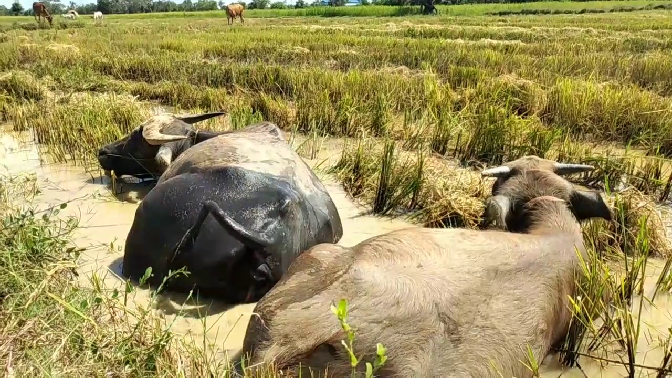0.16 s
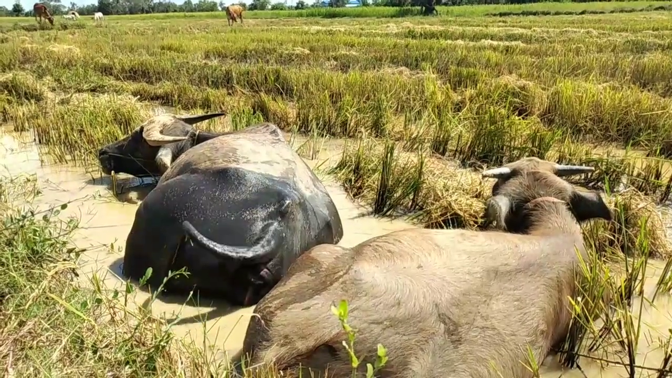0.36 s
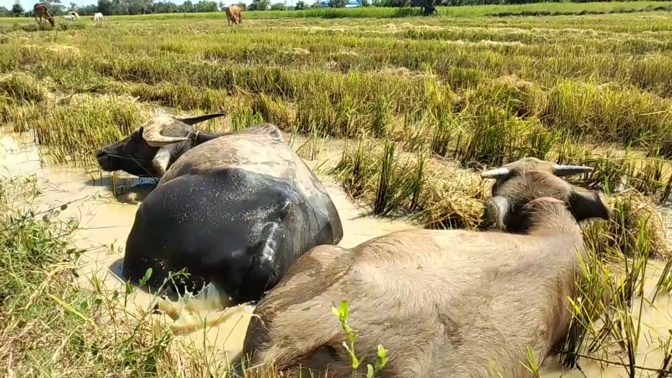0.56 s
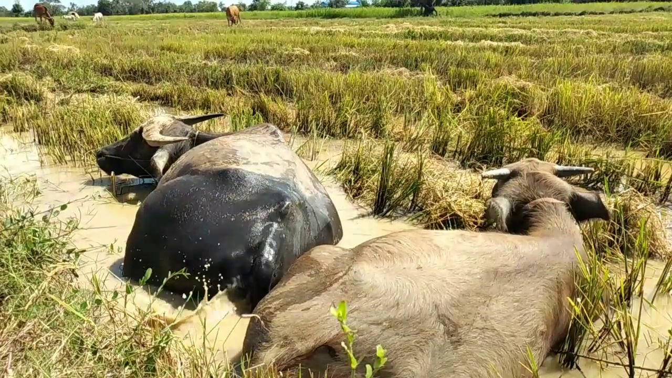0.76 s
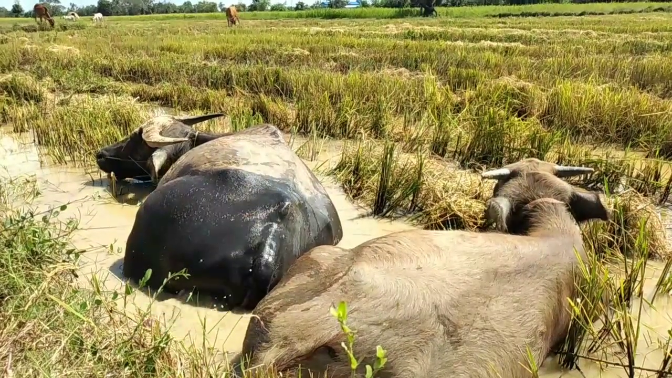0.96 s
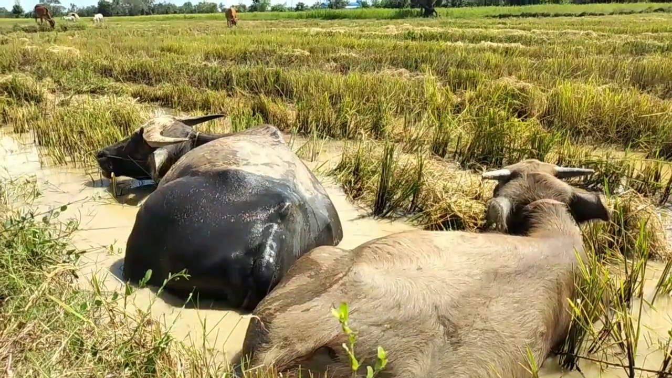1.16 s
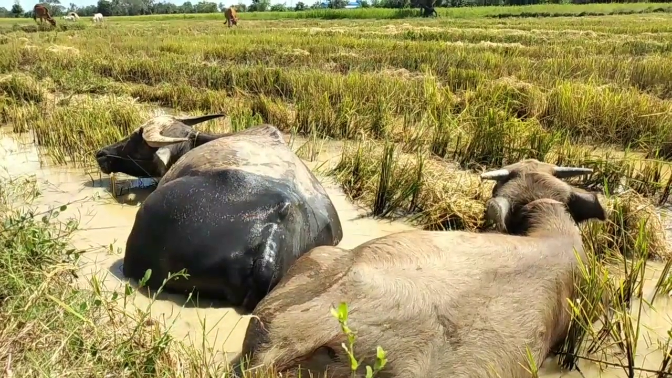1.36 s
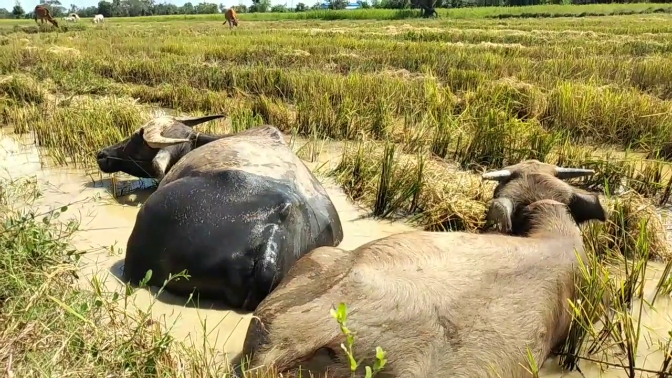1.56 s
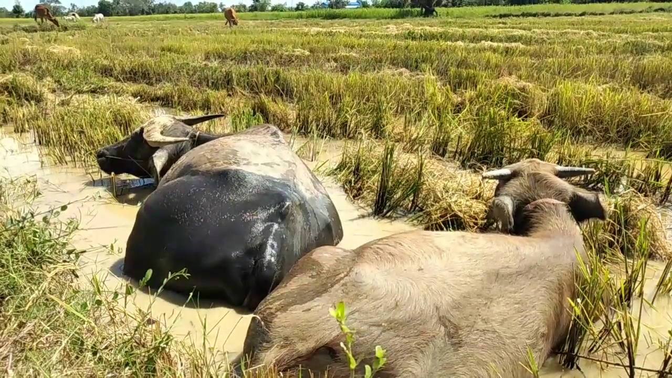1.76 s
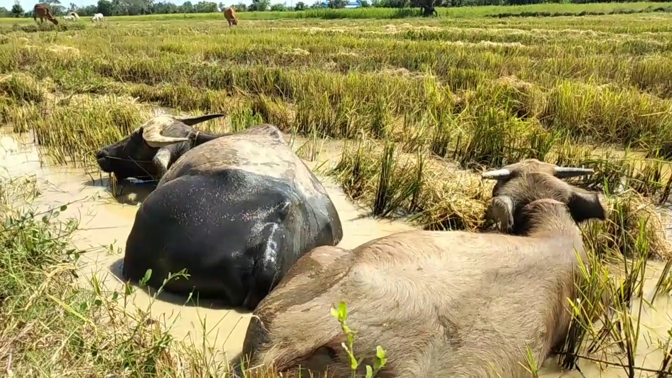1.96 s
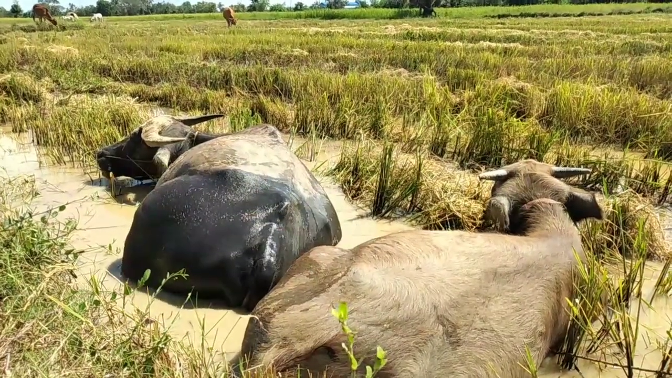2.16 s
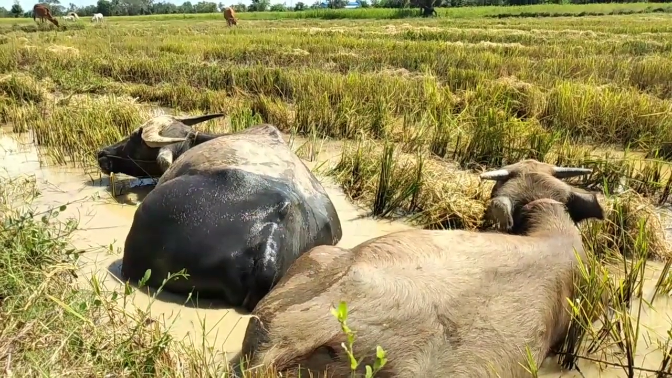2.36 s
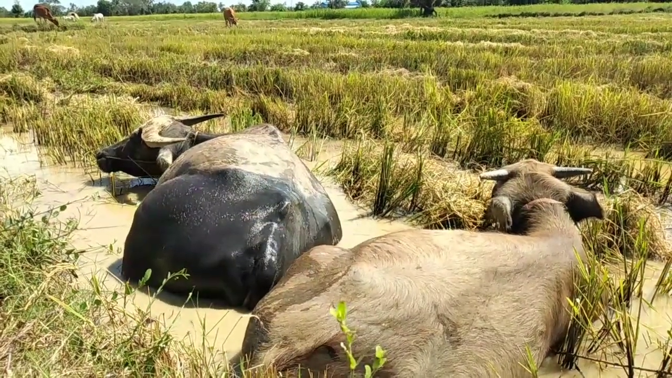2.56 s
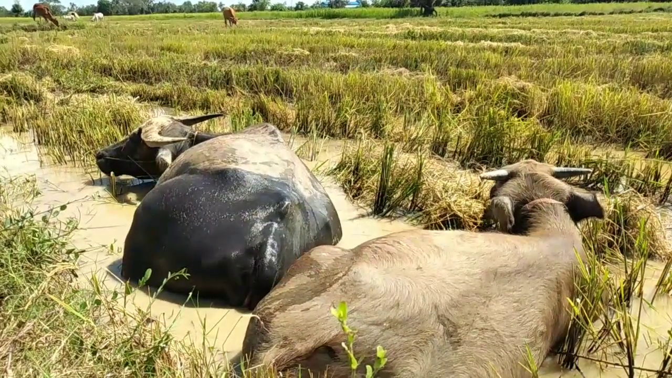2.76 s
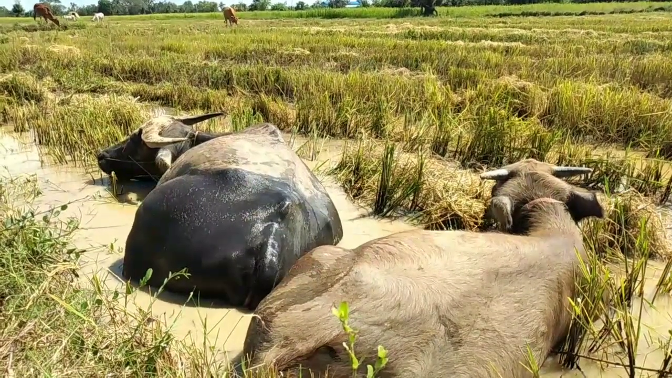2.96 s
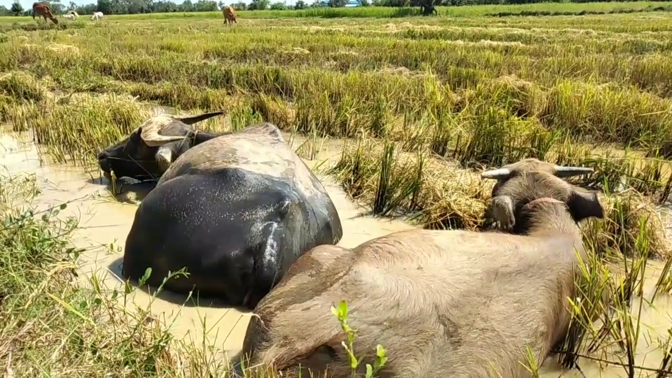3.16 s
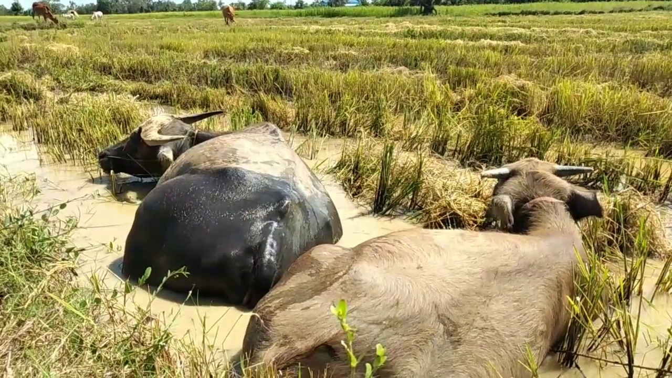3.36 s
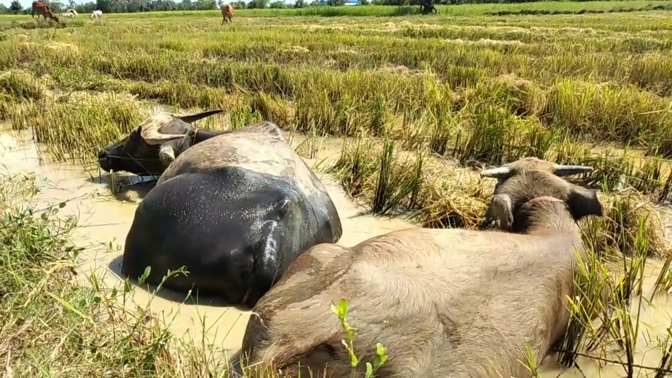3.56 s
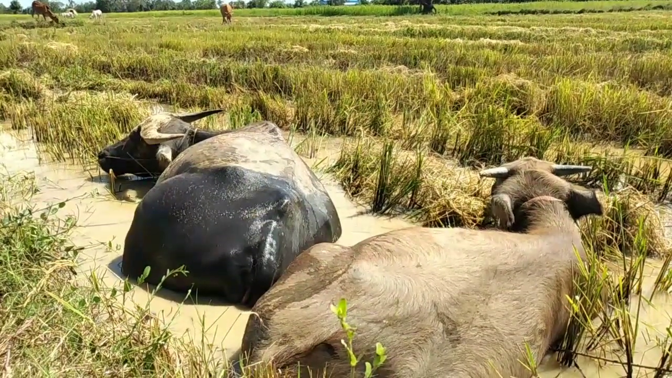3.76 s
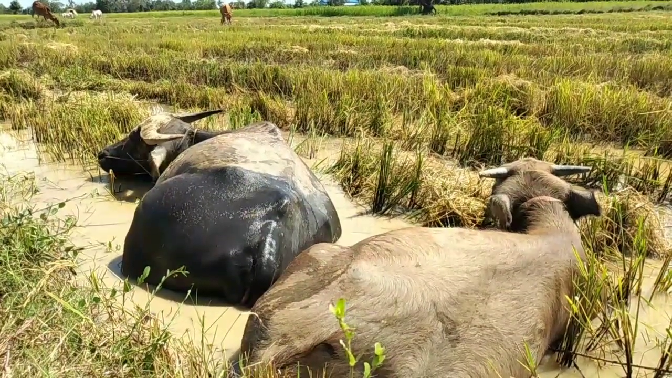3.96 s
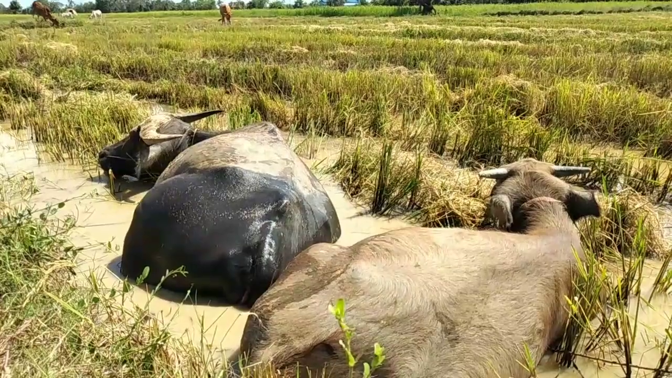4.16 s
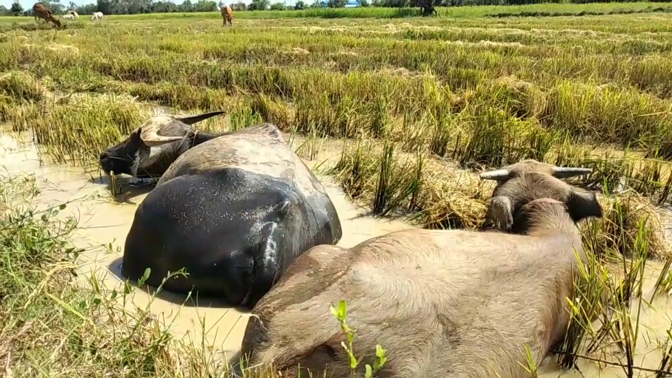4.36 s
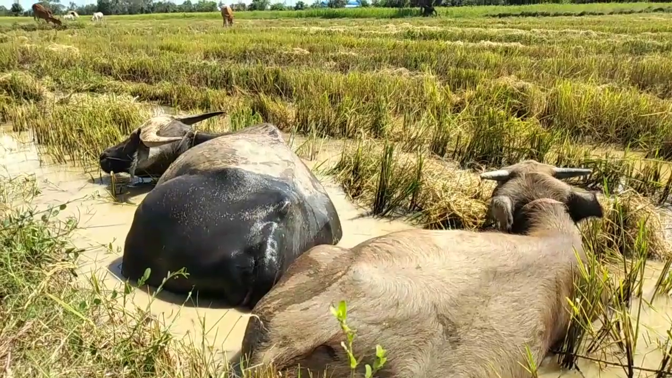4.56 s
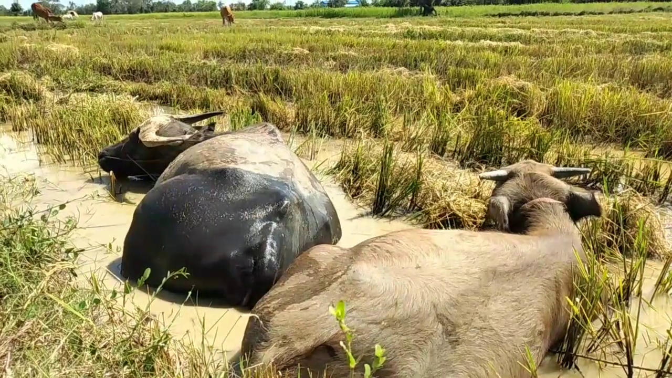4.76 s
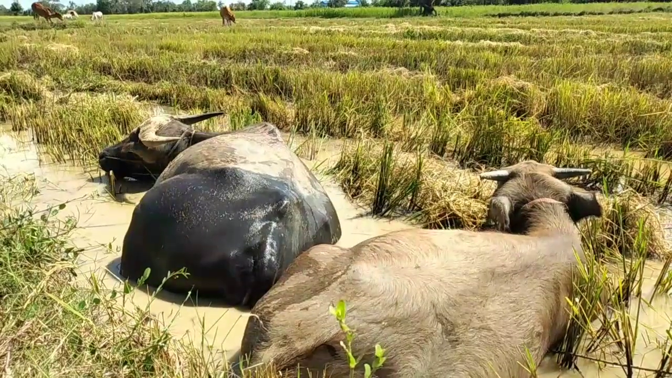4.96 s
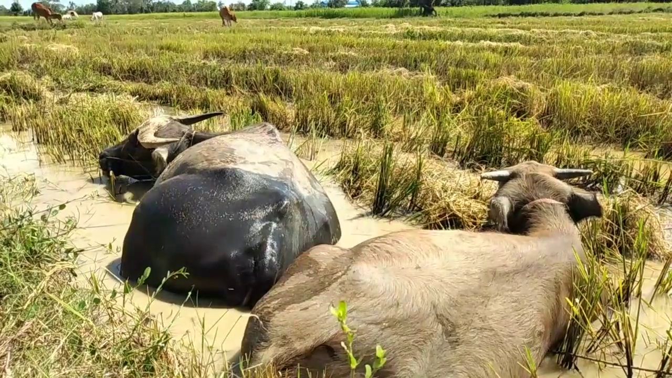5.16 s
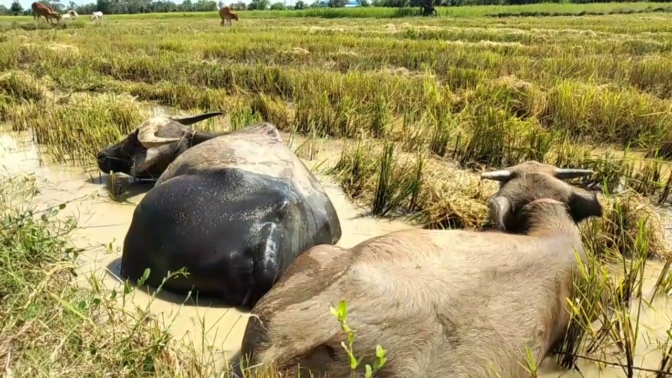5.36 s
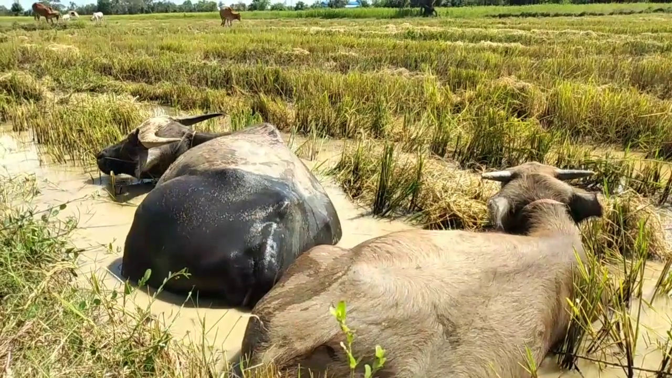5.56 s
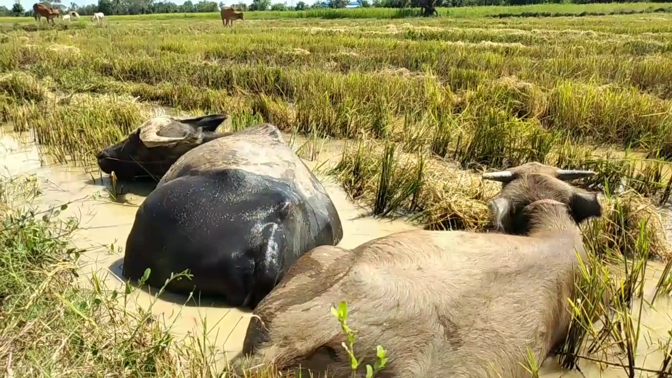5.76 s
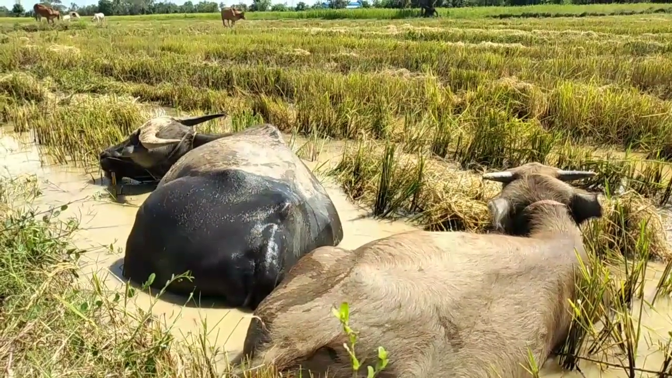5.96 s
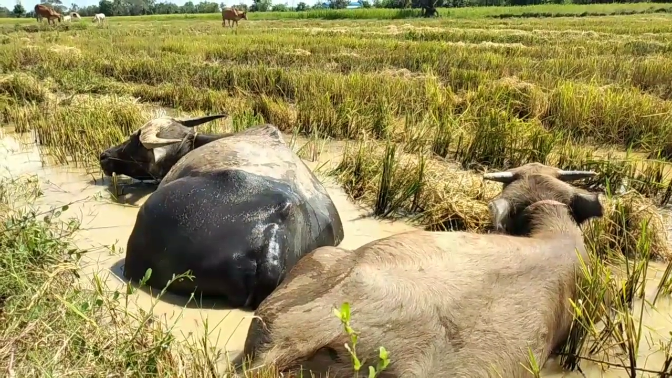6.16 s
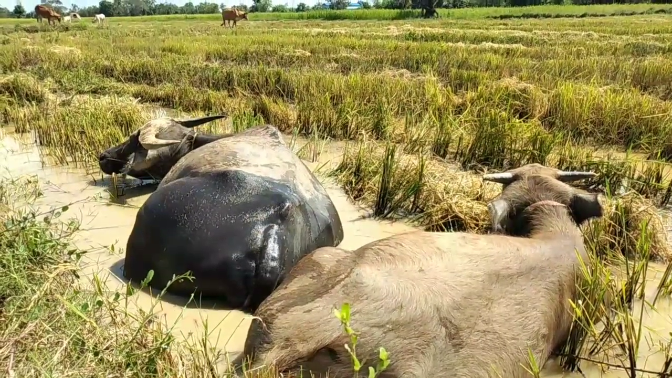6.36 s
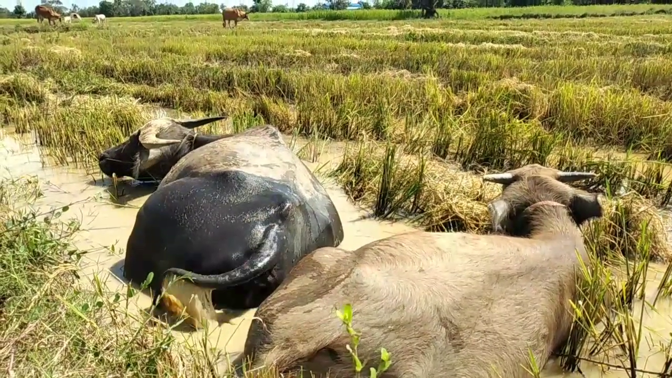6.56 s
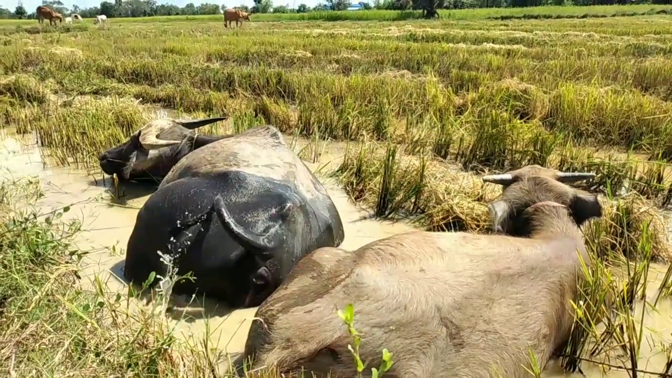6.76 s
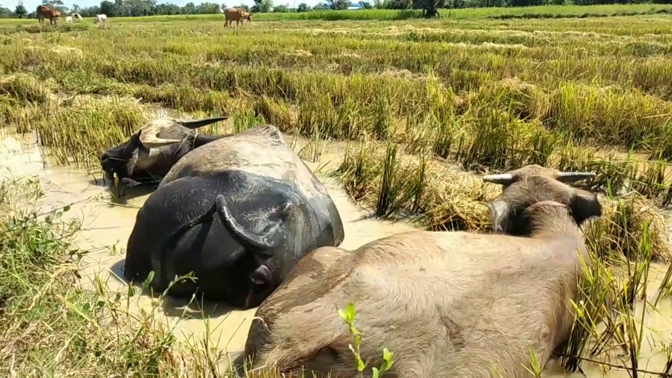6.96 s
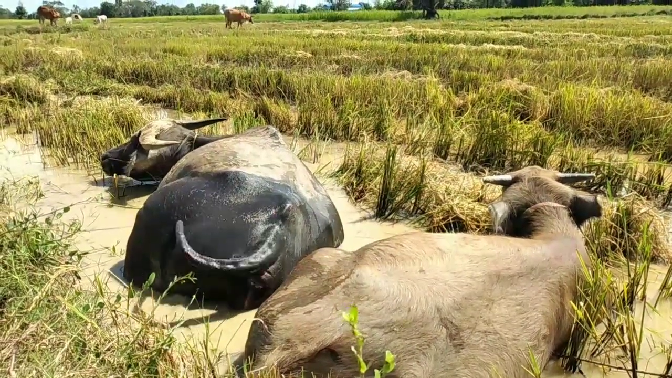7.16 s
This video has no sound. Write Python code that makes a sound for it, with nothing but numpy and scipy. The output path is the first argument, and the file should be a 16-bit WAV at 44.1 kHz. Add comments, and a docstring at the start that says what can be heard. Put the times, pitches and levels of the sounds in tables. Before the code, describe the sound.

Outdoor stereo in a flooded stubble field. Bright, spattering tail slaps and droplets come first, close by, over a faraway slow diesel engine puttering around twenty-odd beats a second. Faint high cricket chirps, thin falling bird whistles and brief insect buzzes fill the calm middle, with only stray water ticks. A second short burst of splashing, plops and one very sharp snap ends it, while a bird rasps softly behind.

```python
"""Two buffalo lie in a mud pool; one swishes its wet tail through the water at once, and again near 6.6 s.
Slaps are noise bursts, spray is mist and droplets, bubbles are rising rings; a far one-cylinder diesel
thuds in pulses through its pipe over noise for rumble and wash. Next a cricket ticks, birds whistle in
gliding tones and insects buzz; a warbler sings near 4 s, and a bird rasps in noise around the second swish.
All is heard through two small microphone ports, each with its own ring."""
import sys
import numpy as np
from scipy import signal
from scipy.fft import rfft, irfft
from scipy.io import wavfile
from scipy.ndimage import uniform_filter1d

SR = 44100
rng = np.random.default_rng(int(sys.argv[2]) if len(sys.argv) > 2 else 0)


def to_wav(s):
    """Save 16-bit WAV."""
    ch = np.atleast_2d(s).T  # columns
    pcm = np.round(np.clip(ch, -1, 1) * 32767)  # PCM
    wavfile.write(sys.argv[1], SR, pcm.astype(np.int16))


N = 318402
TIME = np.arange(N) / SR

# All levels are relative: layer gains, echoes and the ports act on them later.
# sheets of flung water: (time [s], length [s], droplet level [dB], gurgle level [dB])
SPRAYS = [(0, 0.13, -59, -61), (0.1, 0.16, -52, -67), (0.533, 0.065, -45.5, -63.5),
          (0.582, 0.095, -54, -74), (0.663, 0.033, -48.5, -52.5), (0.691, 0.097, -56, -60.5),
          (0.827, 0.21, -58.5, -66.5), (6.542, 0.21, -63.5, -60.5), (6.687, 0.079, -56.5, -59),
          (6.739, 0.17, -52.5, -61.5), (6.867, 0.12, -61.5, -64)]
# colour of the spray: (frequency [Hz], level [dB])
SPRAY_COLOUR = [(300, -66), (1500, -17), (3000, 7), (4200, 4.5), (6000, 9), (7500, 7.5), (10000, 8),
                (13000, 0), (16000, -4)]
# sizes of the churned bubbles, as a spectrum: (frequency [Hz], level [dB])
GURGLE_COLOUR = [(400, -14), (700, -10), (1400, 1), (2200, 14), (3200, 8.5), (5000, 2)]
# engine speed: (time [s], rate [firings/s])
FIRING_RATE = [(0.0, 26.48), (0.19, 25.1), (1.35, 23.93), (1.49, 24.93), (2.51, 22.57), (3.31, 23.55),
               (4.27, 21.53), (4.71, 22.11), (5.11, 21.07), (5.42, 22.85), (6.26, 20.44), (6.76, 22.87),
               (7.22, 21.62)]
# moments when the engine all but misses a firing: (time [s])
MISFIRES = [1.21, 1.9, 3.12, 4.12, 4.17, 4.32, 5.09, 5.32, 6.4, 6.9, 7.05]
# engine load, driving gas and overtone: (time [s], level [dB])
ENGINE_LOAD = [(0, -32.5), (.31, -44.5), (.6, -36), (1.0, -38.5), (1.22, -40), (1.5, -39.5), (2.0, -38),
               (2.3, -39), (2.6, -42), (2.84, -40), (3.2, -33.5), (4.0, -34), (4.2, -45), (4.62, -45),
               (4.8, -38), (5.07, -46), (5.45, -38.5), (6.3, -46), (6.52, -53), (7.22, -45)]
# low thud of each firing: (time [s], level [dB])
THUD_LEVEL = [(0, -35.5), (.31, -42), (.7, -37), (1.25, -40), (2.3, -38), (2.85, -41.5), (3.3, -37.5),
              (4.0, -41.5), (4.5, -41.5), (5.1, -42), (5.5, -40), (6.3, -48), (7.22, -46.5)]
# boom of the exhaust pipe: (time [s], level [dB])
PIPE_BOOM = [(0, -45.5), (.3, -52), (1.2, -47), (1.5, -35), (2.1, -35.5), (2.35, -44.5), (2.55, -37),
             (2.85, -57.5), (3.22, -36), (4.03, -37.5), (4.25, -54), (4.8, -42.5), (5.05, -51.5),
             (5.45, -40.5), (6.2, -48), (7.22, -51.5)]
# exhaust pipe and silencer: (frequency [Hz], level [dB])
EXHAUST_COLOUR = [(18, -45.5), (48, -5), (75, -11), (100, -9.5), (125, 3.5), (152, 1), (172, -11),
                  (198, -12), (240, -12), (305, -8.5), (360, -26.5), (460, -44.5), (900, -41),
                  (2500, -78.5)]
# gas that puffs out after each firing: (frequency [Hz], level [dB])
PUFF_COLOUR = [(40, -19), (100, -19), (150, -1), (200, -12), (250, -3), (320, 3), (380, -17.5),
               (470, -20.5), (900, -25.5), (2500, -57)]
# low rumble of the air and the far engine: (time [s], level [dB])
RUMBLE_LEVEL = [(0, -52.5), (.7, -48.5), (1.25, -52), (2.0, -54.5), (2.8, -53.5), (3.3, -52), (3.8, -53.5),
                (4.4, -55), (5.0, -56), (5.6, -54.5), (6.2, -57.5), (6.7, -56.5), (7.22, -57)]
# colour of the rumble: (frequency [Hz], level [dB])
RUMBLE_COLOUR = [(12, -9), (30, -9), (55, -5.5), (110, -2), (170, -11), (270, -16), (400, -30.5),
                 (800, -51.5), (3000, -104)]
# wash of the open field: (time [s], level [dB])
FIELD_LEVEL = [(0, -57.5), (3.3, -60.5), (4.5, -63), (7.22, -64)]
# colour of the wash: (frequency [Hz], level [dB])
FIELD_COLOUR = [(100, 14.5), (450, 13), (900, 8), (1500, 9), (2400, 9.5), (3300, 5), (4500, 3), (7000, -1),
                (10000, 4.5), (13000, -9), (16000, -4)]
# likeness of the wash at the two ports: (frequency [Hz], share [0-1])
FIELD_SAME = [(100, 0.24), (600, 1), (1500, 0.45), (3000, 0.025), (16000, 0.062)]
# loudest slaps of tail and falling water: (time [s], spatter level [dB], pan, left over right [dB],
# splat level [dB], spatter length, twice its time to peak [ms], lower edge of the spatter [Hz])
SLAPS = [(0.0145, -36.5, -16, -47.5, 4.4, 2500), (0.0253, -35, -1, -43.5, 1.8, 1200),
         (0.062, -45, 5, -72, 3.6, 2500), (0.133, -34, 1, -73, 6.3, 3500), (0.143, -35, 0, -73, 2.4, 3500),
         (0.219, -31.5, -6, -68, 3.4, 2500), (.358, -39.5, 20, -75, 0.74, 6000),
         (0.5402, -33.5, -30, -52, 4.7, 3480), (0.6481, -25.5, 12, -30, 2.6, 1500),
         (0.651, -31, -9, -35.5, 1.5, 1000), (0.6768, -31, 30, -65, 1.6, 5000),
         (0.685, -26.5, 16, -52, 0.59, 4500), (0.6932, -26, 17, -71, 1.15, 5000),
         (0.7578, -38, -4, -51, 1.8, 2500), (0.875, -39, 8, -72, 1.8, 5000),
         (0.8936, -28.5, 32, -68, 0.86, 3980), (0.9366, -41, 1, -54, 2.6, 4000),
         (1.012, -40, -10, -49, 2.7, 3000), (3.881, -45.5, -23, -65, 3.8, 6000),
         (4.8, -50, 4.5, -67, 2.5, 1500), (4.965, -53, 25, -82, 2.3, 4030),
         (5.159, -46.5, -3, -78, 3.3, 4500), (5.5937, -42.5, -0.5, -69, 2, 4500),
         (5.7246, -40.5, -1, -54, 0.77, 2000), (5.9298, -38.5, 22, -77, 2.56, 4430),
         (6.59, -43, 11, -67, 1.3, 4000), (6.655, -34, 29, -44, 1.6, 3500),
         (6.6964, -47, 3, -57, 1.6, 4500), (6.7166, -33, 11, -41.5, 3.6, 1200),
         (6.766, -40.5, 14, -68, 3, 3480), (6.7994, -39, 8, -74, 1.3, 4000),
         (6.811, -38.5, 21, -68, 4, 3000), (6.8316, -36, 15, -72, 2.8, 4000),
         (6.8414, -16.5, -5, -67, 0.52, 6500), (6.8563, -25.5, 33, -60, 1.6, 5500),
         (6.878, -36, -20, -70, 2.8, 6000), (6.886, -31, -6, -74, 2.8, 5500),
         (6.934, -41, 30, -80, 1.7, 4500), (6.947, -50, 13, -78, 1.8, 3900),
         (7.018, -35, -10, -78, 1.53, 3980)]
# colour of the spatter: (frequency [Hz], level [dB])
SPATTER_COLOUR = [(300, -99), (1500, -28), (3000, 8.5), (4200, -2), (6000, 15.5), (7500, 11), (10000, 12),
                  (13000, -1.5), (16000, 1.5)]
# colour of the low splat: (frequency [Hz], level [dB])
SPLAT_COLOUR = [(150, 6), (450, 0), (650, 6), (1000, 3.5), (1300, 6.5), (1700, -9.5), (2400, 0.5),
                (4000, -14), (9000, -56)]
# loudest ringing air pockets, from large to tiny: (time [s], pitch [Hz], level [dB])
BUBBLES = [(.025, 850, -47), (.031, 633, -44.5), (.062, 2700, -29.5), (.218, 1630, -40), (.649, 565, -55),
           (.652, 690, -55), (.653, 1190, -44), (.76, 980, -50), (.879, 2150, -41), (.94, 1620, -52),
           (.947, 1380, -44.5), (.951, 2170, -39), (.962, 735, -44), (.983, 726, -48), (1.004, 1460, -46),
           (1.005, 720, -48), (6.567, 786, -48.5), (6.609, 2020, -40), (6.634, 850, -43), (6.659, 700, -46),
           (6.663, 2180, -34.5), (6.719, 1580, -36), (6.72, 647, -46), (6.721, 2090, -33),
           (6.726, 1060, -36.5), (6.74, 1420, -45), (6.747, 3050, -32.5), (6.77, 2520, -34.5),
           (6.814, 3480, -34), (6.826, 1380, -42.5), (6.857, 1750, -31.5), (6.8576, 7240, -21)]
# a cricket's bouts of two-stroke chirps: (start [s], end [s], pitch [Hz], level [dB])
CRICKET_BOUTS = [(.144, 2.92, 7876, -65.5), (3.986, 6.5, 7892, -66)]
# a second cricket's short, even trills: (time [s], length [s], pitch [Hz], level [dB])
TRILLS = [(.36, .11, 7250, -72), (2.271, .115, 7200, -76), (2.472, 0.1, 7230, -73),
          (5.95, 0.054, 7200, -70), (6.017, .08, 7320, -80)]
# slurred whistles, most of them falling:
# (time [s], length [s], start [Hz], middle [Hz], end [Hz], level [dB])
SLURS = [(0.93, 0.15, 5550, 5300, 4870, -61.5), (2.222, 0.11, 5370, 4700, 4250, -56.5),
         (5.388, 0.13, 2790, 2794, 2790, -61.5), (5.564, 0.18, 5200, 5030, 4480, -71),
         (5.776, .052, 3180, 3190, 3050, -65.5), (5.816, 0.08, 2920, 3040, 2850, -63),
         (5.857, 0.049, 2740, 2784, 2720, -60.5), (5.897, 0.052, 2560, 2370, 2380, -64),
         (5.751, 0.16, 6700, 6020, 5450, -70), (5.95, 0.11, 5450, 4450, 3630, -69),
         (6.28, .18, 5550, 4870, 3200, -65.5), (6.572, 0.13, 3140, 2770, 2300, -69)]
# a small bird's chips, all one arch: (time [s], length [s], middle pitch [Hz], level [dB])
CHIPS = [(1.192, 0.063, 5260, -63), (1.298, 0.043, 5400, -64), (1.399, 0.034, 5240, -65),
         (1.492, 0.026, 5180, -58.5), (1.542, 0.025, 5080, -59), (1.91, 0.049, 4920, -61.5),
         (2.002, 0.033, 5130, -54.5), (2.16, 0.066, 5230, -54), (6.167, 0.032, 6060, -60)]
# a warbler's phrase: (time from its accent [s], length [s], start [Hz], middle [Hz], end [Hz], level [dB])
PHRASE = [(-.068, .018, 2520, 2400, 2200, -5), (-.046, .028, 1540, 1800, 1720, -2),
          (-.002, .02, 2210, 2640, 2720, 6), (.018, .016, 2800, 3200, 3600, -1),
          (.032, .016, 2950, 2650, 2350, -2), (.08, .03, 2450, 2270, 2120, 5),
          (.11, .024, 2200, 2520, 2150, 2), (.126, .036, 1950, 1690, 1580, -1)]
# when the warbler sings it: (time [s], level [dB])
PHRASES = [(3.842, -57.5), (4.126, -53.5), (4.421, -54.5)]
# short insect buzzes: (time [s], length [s], centre [Hz], width [Hz], level [dB])
BUZZES = [(1.23, 0.056, 12200, 800, -72), (1.736, .075, 12200, 897, -71), (3.05, .082, 12700, 410, -78),
          (6.313, 0.035, 9770, 150, -64.5)]
# a bird's harsh rasps: (time [s], length [s], level [dB])
RASPS = [(6.203, 0.29, -61.5), (6.885, 0.27, -60.5)]
# ring of each port: (frequency [Hz], level [dB])
LEFT_PORT = [(300, -2), (2000, 3.5), (4400, 3), (6000, 7.5), (7300, 16.5), (8100, 10), (9200, -5),
             (11000, 3), (15000, 5)]
RIGHT_PORT = [(300, -2.5), (2000, 0.5), (4200, 2), (6500, 1), (8000, 3), (10200, 8.5), (11800, 13.5),
              (13500, 10), (15000, 1.5)]

MISFIRE_DB, UNEVEN_DB = -20.5, .8  # drop of a missed firing; random spread of all firings
PUFF_S = .012  # decay constant of a puff
DRIFT_DB = .9  # depth of the wash's drift
CHIRP_S, STROKE_GAP_S, STROKE_S = .1347, .048, .027  # chirp period, stroke to stroke, stroke length
CHIP_START, CHIP_END = .79, .89  # pitch at both ends of a chip, as shares of its middle
SLUR_WAVER, SLUR_FLUTTER = .007, .4  # unsteadiness of a slur's pitch and strength
RASP_HZ, RASP_WIDTH_HZ = 2220, 810
EDGE_HZ = 15600  # upper band limit


def amp(db):
    """Decibels to gain."""
    return 10 ** (np.asarray(db) / 20)


def unit(x):
    """Scales to rms 1."""
    return x / np.sqrt(np.mean(x ** 2) + 1e-20)


def at_hz(points, hz):
    """Reads a spectrum on a log-frequency axis."""
    f, value = np.transpose(points)
    return np.interp(np.log(hz + 1), np.log(f), value)


def at_time(points, s):
    """Reads a curve."""
    return np.interp(s, *np.transpose(points))


def add(mix, s, sound):
    """Mixes a sound in at time s."""
    start = max(round(s * SR), 0)
    part = mix[..., start:][..., :sound.shape[-1]]
    part += sound[..., :part.shape[-1]]


def ring(points, size=8192):
    """Causal impulse response of energy 1 with the given spectrum."""
    hz = abs(np.fft.fftfreq(size, 1 / SR))
    log_gain = np.log(amp(at_hz(points, hz)))
    minimum_phase = np.exp(np.conj(signal.hilbert(log_gain)))
    response = np.fft.ifft(minimum_phase).real[:size // 2]
    return response / np.linalg.norm(response)


def colour(x, points):
    """Passes a sound through such a response."""
    return signal.oaconvolve(np.atleast_2d(x), ring(points)[None], axes=1)[:, :N]


def noise_pair(points, same):
    """Two channels of coloured noise, alike by the share same."""
    left, other = rfft(rng.standard_normal((2, N)))
    same = np.clip(same, 0, 1)
    right = same * left + np.sqrt(1 - same ** 2) * other
    gain = amp(at_hz(points, np.fft.rfftfreq(N, 1 / SR)))
    return unit(irfft(np.array([left, right]) * gain, N))


def scatter(x, t60, wet_db):
    """Adds the diffuse echo of banks and stubble: noise that falls 60 dB in t60 seconds."""
    t = TIME[:SR // 2]
    tail = rng.standard_normal((2, len(t))) * amp(-60 * t / t60) * (t > .002)
    tail /= np.linalg.norm(tail, axis=1, keepdims=True)
    return x + amp(wet_db) * signal.fftconvolve(np.atleast_2d(x), tail, axes=1)[:, :N]


def bubble(hz, cycles, rise, onset_s):
    """A trapped air pocket rings for a few cycles, rising in pitch as it nears the surface."""
    t = TIME[:SR // 12]
    age = t * hz / cycles
    turns = np.cumsum(hz * (1 + rise * (np.minimum(age, 4) - .5))) / SR
    return np.exp(-age) * (1 - np.exp(-t / onset_s)) * np.sin(2 * np.pi * turns)


def swarm(low_hz, high_hz, per_s, spread_db, cycles, onset_s, count=28):
    """A steady stream of bubbles in many sizes, each with its own strength in either channel."""
    out = np.zeros((2, N))
    for hz in np.geomspace(low_hz, high_hz, count):
        born = rng.random(N) < per_s / count / SR
        births = born * amp(spread_db * np.minimum(rng.exponential(1, N), 3))
        placed = births * (1 + .5 * rng.standard_normal((2, N)))
        shape = unit(bubble(hz, cycles, .04, onset_s))
        out += signal.oaconvolve(placed, shape[None], axes=1)[:, :N]
    return unit(out)


def patter(per_s, decay_s):
    """Stray drops of any size land at random, each a tiny burst of noise."""
    landings = (rng.random(N) < per_s / SR) * rng.random(N)
    t = TIME[:SR // 50]
    bursts = signal.oaconvolve(landings, t / decay_s * np.exp(-t / decay_s))[:N]
    return unit(bursts * rng.standard_normal((2, N)))


def spray(mist_db=-9, drops_db=-6.0, patter_db=-9, gurgle_db=0):
    """Sheets of water break into mist, pinging droplets and a patter of drops; the pool gurgles below."""
    flung, churn = np.zeros((2, N))
    for s, length, db, churn_db in SPRAYS:
        swell = signal.windows.tukey(int(length * SR), .5)
        add(flung, s, amp(db) * swell)
        add(churn, s, amp(churn_db) * swell)
    drops = swarm(3600, 14500, per_s=1000, spread_db=3.5, cycles=3.5, onset_s=0.0001)
    gurgle = swarm(520, 3600, per_s=1000, spread_db=2, cycles=4.5, onset_s=0.001)
    fine = amp(drops_db) * drops + amp(mist_db) * rng.standard_normal((2, N))
    fine += amp(patter_db) * patter(per_s=230, decay_s=0.0013)
    return colour(flung * fine, SPRAY_COLOUR) + amp(gurgle_db) * colour(churn * gurgle, GURGLE_COLOUR)


def pipe_mode(pulses, hz, swell_s):
    """One mode of the exhaust pipe swells and dies after each pulse."""
    t = TIME[:SR // 10]
    swell = (t / swell_s * np.exp(1 - t / swell_s)) ** 2
    return signal.oaconvolve(pulses, swell * np.sin(2 * np.pi * hz * t))[:N]


def engine(puff_db=-21, pipe_hz=158, pipe_s=0.01, overtone_hz=305, overtone_s=.0065, overtone_db=-13.0):
    """Each firing sends a thud and a puff down the exhaust; the pipe booms, its overtone growing with load."""
    turns = np.cumsum(at_time(FIRING_RATE, TIME)) / SR
    times = np.r_[0, TIME[1:][np.diff(np.floor(turns)) > 0]]
    db = UNEVEN_DB * rng.standard_normal(len(times))
    for s in MISFIRES:
        db[np.argmin(abs(times - s))] += MISFIRE_DB
    firings = np.zeros(N)
    firings[np.round(times * SR).astype(int)] = amp(db)

    kicks = firings * amp(at_time(ENGINE_LOAD, TIME))
    puffs = signal.lfilter([1], [1, -np.exp(-1 / (PUFF_S * SR))], kicks)
    gas = puffs * unit(colour(rng.standard_normal(N), PUFF_COLOUR))
    thuds = colour(firings * amp(at_time(THUD_LEVEL, TIME)), EXHAUST_COLOUR)
    thuds /= abs(ring(EXHAUST_COLOUR)).max()
    booms = pipe_mode(firings * amp(at_time(PIPE_BOOM, TIME)), pipe_hz, pipe_s)
    booms += amp(overtone_db) * pipe_mode(kicks, overtone_hz, overtone_s)
    return scatter(thuds + amp(puff_db) * gas + booms, t60=0.11, wet_db=-39)


def drifting(x, depth_db):
    """Lets patches of a wash, some tenths of a second long, swell and sink."""
    z = signal.stft(x, nperseg=512)[2]
    patches = rng.standard_normal(z.shape[1:])
    for _ in range(2):
        patches = uniform_filter1d(patches, size=14, axis=0)  # across frequency
        patches = uniform_filter1d(patches, size=40, axis=1)  # across time
    return signal.istft(z * amp(depth_db * unit(patches)), nperseg=512)[1][:, :N]


def field(rumble_db=5.5):
    """Low rumble, and the gently drifting wash of grass and far insects, both shaped from noise."""
    rumble = amp(at_time(RUMBLE_LEVEL, TIME) + rumble_db) * noise_pair(RUMBLE_COLOUR, same=0.98)
    wash = noise_pair(FIELD_COLOUR, at_hz(FIELD_SAME, np.fft.rfftfreq(N, 1 / SR)))
    return rumble + amp(at_time(FIELD_LEVEL, TIME)) * drifting(wash, DRIFT_DB)


def slaps(spatter_db=-10, splat_db=3, splat_s=0.0028, swell_s=0.00059, apart=0.95, pan_share=0.34):
    """Each slap is a swelling, dying burst of spatter, thinner for finer drops, over a duller splat."""
    t = TIME[:SR // 20]
    spatter, splat = np.zeros((2, 2, N))
    for s, db, pan_db, low_db, decay_ms, edge_hz in SLAPS:
        white = rng.standard_normal((2, 3, len(t)))
        burst, push = white[:, :1] + apart * white[:, 1:]  # shared noise plus each side's own
        sides = amp(pan_share * pan_db * np.array([[.5], [-.5]]))
        age = 2 * t * 1000 / max(decay_ms, .2)
        burst = burst * (age * np.exp(1 - age)) ** 2
        burst = signal.lfilter(*signal.butter(2, edge_hz, "high", fs=SR), burst)
        add(spatter, s, amp(db + spatter_db) * sides * burst)
        push = push * np.exp(-t / splat_s) * (1 - np.exp(-t / swell_s))
        add(splat, s, amp(low_db + splat_db) * push)
    return colour(spatter, SPATTER_COLOUR) + colour(splat, SPLAT_COLOUR)


def bubbles(cycles=4.96, rise=0.047):
    """The loudest air pockets ring out singly, each a plop that glides upward."""
    out = np.zeros(N)
    for s, hz, db in BUBBLES:
        add(out, s, amp(db) * bubble(hz, cycles, rise, onset_s=0.00033))
    return out


def note(length, start_hz, middle_hz, end_hz, waver, flutter=0):
    """A near-pure whistle that arches through three pitches, unsteady in pitch and, with flutter, strength."""
    u = np.linspace(0, 1, int(length * SR))
    hz = np.polyval(np.polyfit([0, .5, 1], [start_hz, middle_hz, end_hz], 2), u)
    chance = rng.standard_normal((2, SR // 4))
    wobble = unit(uniform_filter1d(chance[0], size=120))[:len(u)]
    fading = unit(uniform_filter1d(uniform_filter1d(chance[1], size=400), size=200))[:len(u)]
    strength = np.sqrt(abs(np.sin(np.pi * u))) * np.exp(flutter * fading - flutter ** 2)
    return strength * np.sin(2 * np.pi * np.cumsum(hz * (1 + waver * wobble)) / SR)


def cricket(drift=0.0024, uneven_db=1.0):
    """One cricket ticks in steady pairs of wing strokes; another answers with short, lower trills."""
    out = np.zeros(N)
    for start, end, hz, db in CRICKET_BOUTS:
        for s in np.arange(start, end, CHIRP_S):
            for offset in (0, STROKE_GAP_S):
                force, detune = rng.standard_normal(2)
                pitch = hz * (1 + drift * detune)
                stroke = note(STROKE_S, pitch, pitch, pitch, waver=.005, flutter=.3)
                add(out, s + offset, amp(db + uneven_db * force) * stroke)
    for s, length, hz, db in TRILLS:
        add(out, s, amp(db) * note(length, hz, hz, hz, waver=.004, flutter=.3))
    return scatter(out, t60=.2, wet_db=-6)


def birds(far_db=1.5):
    """Birds slur and chip further off, fading in the moving air; a warbler repeats its phrase."""
    warbler, others = np.zeros((2, N))
    for s, length, start_hz, middle_hz, end_hz, db in SLURS:
        add(others, s, amp(db) * note(length, start_hz, middle_hz, end_hz, SLUR_WAVER, SLUR_FLUTTER))
    for s, length, middle_hz, db in CHIPS:
        chip = note(length, CHIP_START * middle_hz, middle_hz, CHIP_END * middle_hz, waver=.009, flutter=.4)
        add(others, s, amp(db) * chip)
    for s, db in PHRASES:
        for offset, length, start_hz, middle_hz, end_hz, note_db in PHRASE:
            whistle = note(length, start_hz, middle_hz, end_hz, waver=.025)
            add(warbler, s + offset, amp(db + note_db) * whistle)
    return scatter(warbler, t60=.45, wet_db=-3) + amp(far_db) * scatter(others, t60=.25, wet_db=-9)


def buzz(length, centre_hz, width_hz):
    """Noise in one resonance that swells and fades."""
    hz = np.fft.rfftfreq(SR, 1 / SR)
    resonance = 1 / (1 + ((hz - centre_hz) / (width_hz / 2)) ** 4)
    band = unit(irfft(rfft(rng.standard_normal((2, SR))) * resonance))
    gate = signal.windows.tukey(int(length * SR), .5)
    return band[:, :len(gate)] * gate


def insect_buzzes():
    """Insects buzz briefly in the grass, each a narrow band of noise."""
    out = np.zeros((2, N))
    for s, length, centre_hz, width_hz, db in BUZZES:
        add(out, s, amp(db) * buzz(length, centre_hz, width_hz))
    return out


def rasps():
    """A bird rasps twice, harsh as a broad band of noise."""
    out = np.zeros((2, N))
    for s, length, db in RASPS:
        add(out, s, amp(db) * buzz(length, RASP_HZ, RASP_WIDTH_HZ))
    return out


def from_right(x, lag_s):
    """A sound from the right reaches the left port a little later."""
    hz = np.fft.rfftfreq(N, 1 / SR)
    return irfft(rfft(x) * [np.exp(-2j * np.pi * hz * lag_s), np.ones(len(hz))], N)


def scene():
    """Near water over the far sounds of the field; birds and buzzes come from nearly straight ahead."""
    water = scatter(spray() + slaps() + bubbles(), t60=0.027, wet_db=-7.5)
    aside = from_right(water + engine() + field() + cricket(), lag_s=.00022)
    ahead = from_right(birds() + insect_buzzes() + rasps(), lag_s=.00006)
    return aside + ahead


def record(dry):
    """The two ports colour the sound; then the band limit."""
    hz = np.fft.rfftfreq(N, 1 / SR)
    heard = irfft(rfft(dry) * [amp(at_hz(LEFT_PORT, hz)), amp(at_hz(RIGHT_PORT, hz))], N)
    lowpass = signal.firwin(301, EDGE_HZ, window=("kaiser", 8), fs=SR)
    return signal.oaconvolve(heard, lowpass[None], "same")


dry = scene()
out = record(dry)
to_wav(out)
```